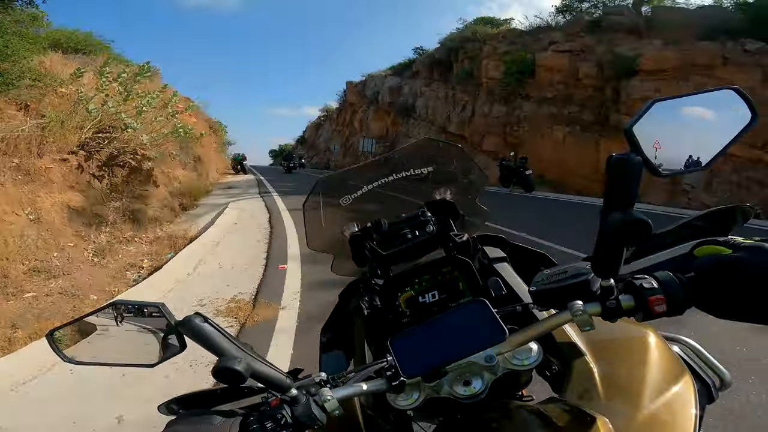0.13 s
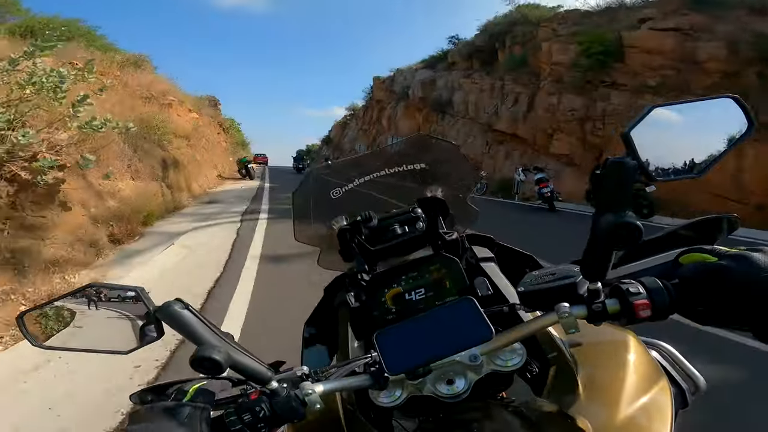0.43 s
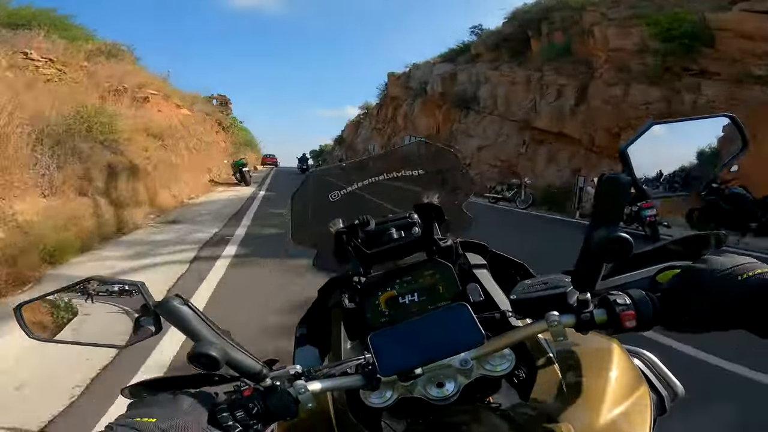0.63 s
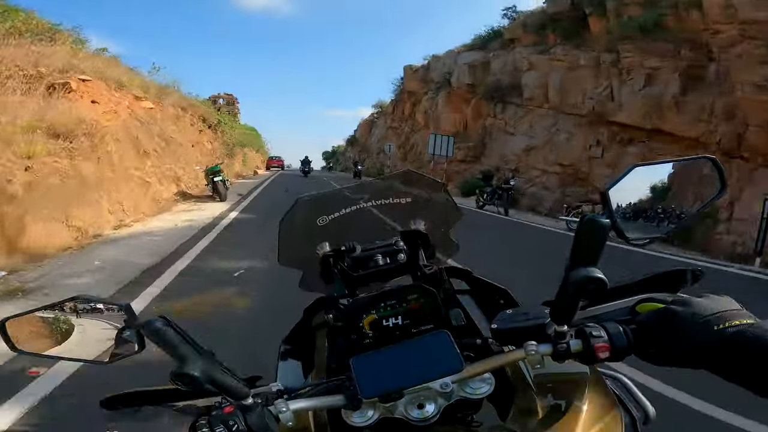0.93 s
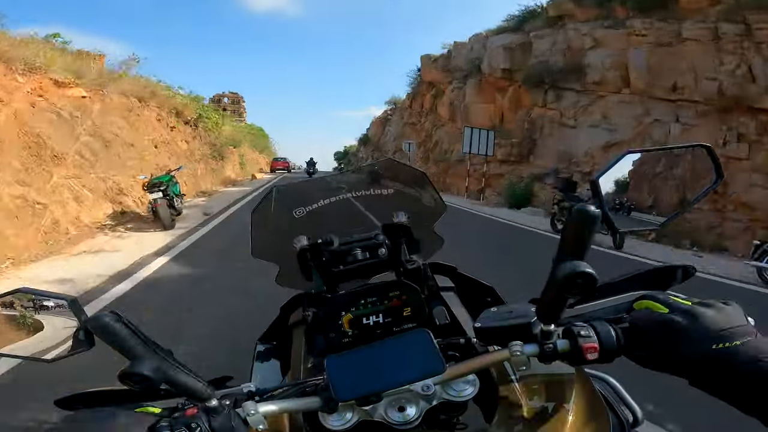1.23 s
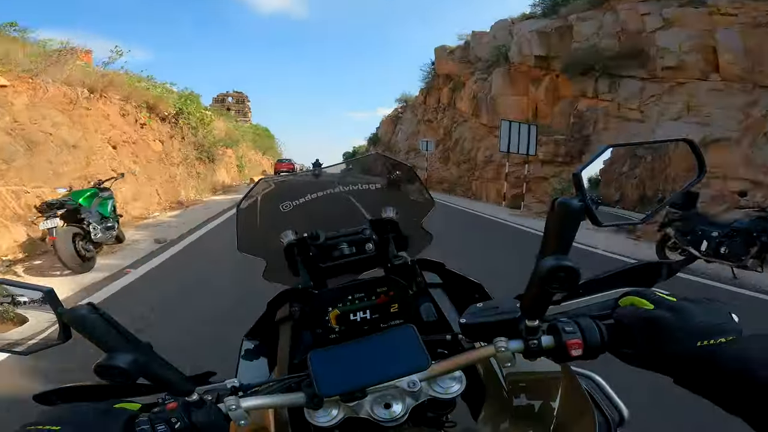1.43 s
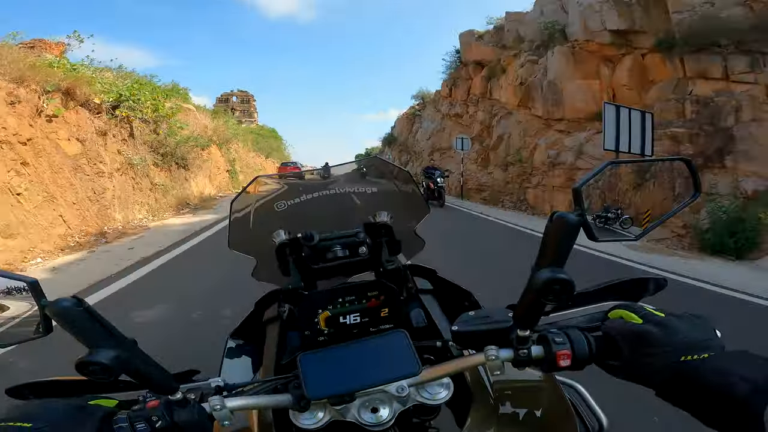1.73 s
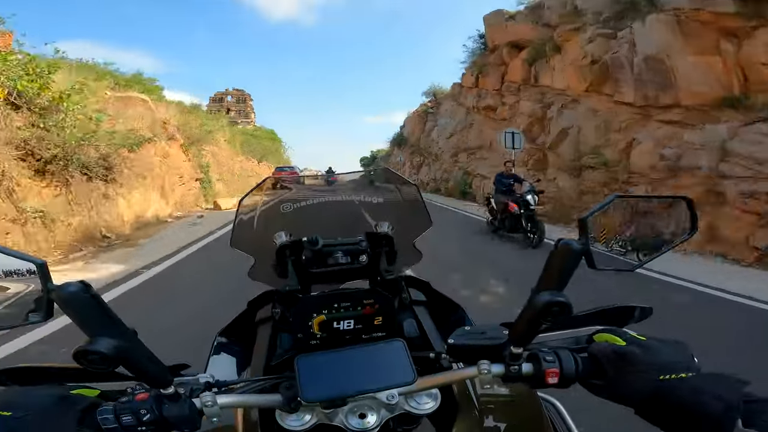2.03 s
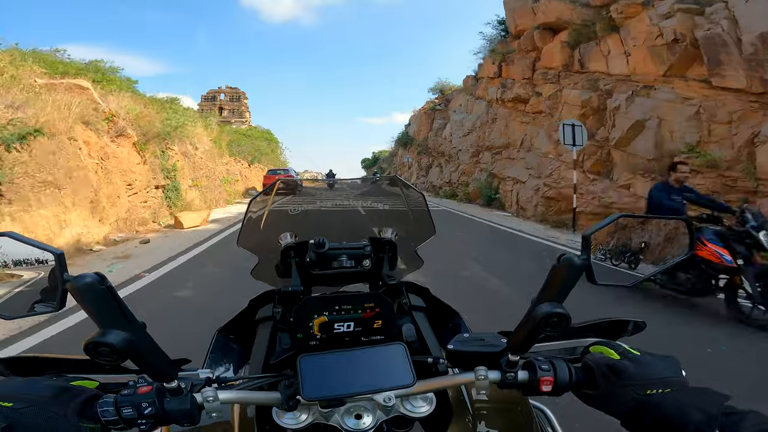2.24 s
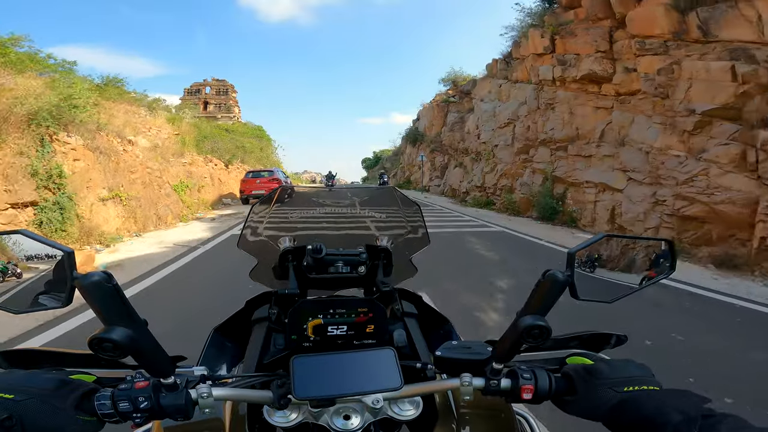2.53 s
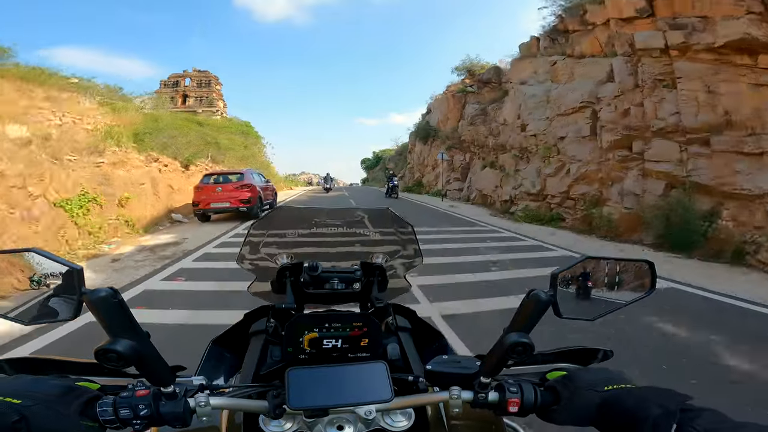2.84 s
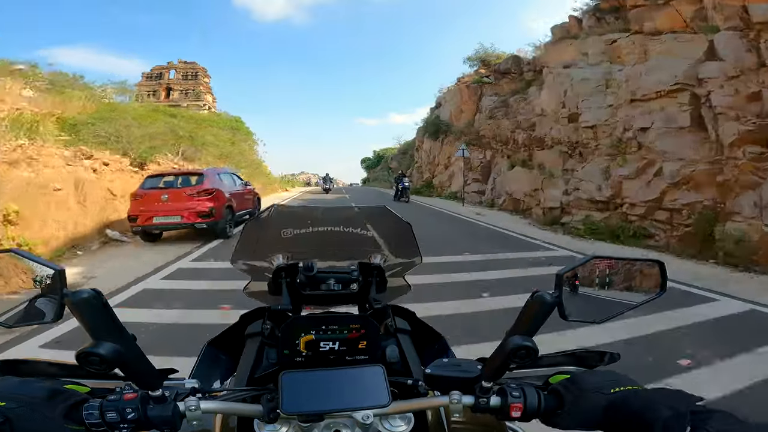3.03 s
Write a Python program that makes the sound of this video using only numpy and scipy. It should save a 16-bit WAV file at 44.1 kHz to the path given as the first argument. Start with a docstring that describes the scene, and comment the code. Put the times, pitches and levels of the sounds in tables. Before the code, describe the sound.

Close onboard motorcycle: throaty uneven exhaust pulses rise, the throttle shuts for a quick gear change, the note sinks, then climbs steadily until the throttle closes; steady roar and wind buffeting, slightly left of centre.

```python
"""A motorcycle pulls uphill, heard by one microphone near the rider's helmet, panned a little left.
The engine pulls; the throttle closes for a gear change with a short clunk, opens again and closes once more.
The exhaust knock, two uneven pulses per cycle ringing pipe resonances, comes and goes with the throttle.
Throughout, three low engine orders boom as tones, and filtered noise makes the wind rumble
and the roar of machinery, intake and road, which throbs with the firing cycle."""
import sys
import numpy as np
from scipy import signal
from scipy.io import wavfile
from scipy.ndimage import uniform_filter1d

SR = 44100
rng = np.random.default_rng(int(sys.argv[2]) if len(sys.argv) > 2 else 0)


def transcribe(signal):
    """Save signal, clipped to [-1, 1], as a 16-bit WAV file at the path in sys.argv[1]."""
    frames = np.atleast_2d(signal).T
    limited = np.clip(frames, -1, 1)
    pcm = np.round(limited * 32767).astype(np.int16)
    wavfile.write(sys.argv[1], SR, pcm)


N = 141120  # samples, 3.2 s


def gain_of(db):
    """The decibel law: amplitude gain for a level in dB."""
    return 10 ** (np.asarray(db) / 20)


def scaled_to_unit_rms(x):
    """Energy normalisation: the root mean square becomes 1."""
    return x / np.sqrt(np.mean(x ** 2) + 1e-20)


def read_spectrum(points, hz):
    """Spectral interpolation on a logarithmic frequency axis."""
    table_hz, value = np.transpose(points)
    return np.interp(np.log(hz + 1), np.log(table_hz + 1), value)


def follow(table, t):
    """Linear interpolation in time: every column of a table, read at the times t."""
    rows = np.array(table)
    return [np.interp(t, rows[:, 0], column) for column in rows.T[1:]]


def drift(seconds):
    """Random fluctuation of rms 1: white noise smoothed by two moving averages."""
    size = max(int(seconds * SR), 2)
    smooth = uniform_filter1d(rng.standard_normal(N), size)
    return scaled_to_unit_rms(uniform_filter1d(smooth, size))


def shaped_noise(field_db, size, patchy_db):
    """Short-time spectral shaping: random spectra under a dB field over (Hz, s), with drifting patches."""
    hop = size // 4
    frames, hz = N // hop + 5, np.fft.rfftfreq(size, 1 / SR)
    real, imaginary, patches = rng.standard_normal((frames, len(hz), 3)).T
    patches = uniform_filter1d(patches, size=8, axis=0)  # across frequency
    patches = scaled_to_unit_rms(uniform_filter1d(patches, size=8, axis=1))  # across time
    spectra = real + 1j * imaginary
    flat = signal.istft(spectra, nperseg=size, noverlap=size - hop)[1]
    level_db = field_db(hz[:, None], np.arange(frames) * hop / SR) + patchy_db * patches
    shaped = signal.istft(spectra * gain_of(level_db), nperseg=size, noverlap=size - hop)[1]
    return shaped[:N] / np.std(flat)


# Spectrum of the wind rumble. Each row: frequency in Hz, relative spectral level in dB.
RUMBLE_SPECTRUM = [(6, -28), (12, 12.5), (20, -12.5), (45, 1.5), (75, -1.5), (110, -6), (150, -18),
                   (250, -45), (500, -78)]
# Gusts of the wind. Each row: time in seconds, relative level of the rumble in dB.
WIND_GUSTS = [(0.0, -9.5), (0.07, -30.5), (0.61, -29), (0.72, -22), (0.79, -16), (0.84, -22), (1.07, -19),
              (1.11, -16), (1.33, -24.5), (1.42, -26), (1.71, -23.5), (2.7, -22.5), (2.74, -22),
              (2.98, -15.5), (3.12, -16.5), (3.19, -26)]


def wind():
    """Low-frequency random pressure: lumpy rumble at the microphone, shaped by spectrum and gusts."""
    def field(hz, t):
        return read_spectrum(RUMBLE_SPECTRUM, hz) + follow(WIND_GUSTS, t)[0] + 24.0
    return shaped_noise(field, size=4096, patchy_db=-1.0)


# Opening of the throttle. Each row: time in seconds, opening from 0 (shut) to 1 (open).
THROTTLE_OPENING = [(0.0, 0.63), (.57, 0.95), (.62, 0.59), (1.14, 0.13), (1.2, 1.0), (2.56, 1), (2.62, 0.2),
                    (3.2, 0.0)]


def throttle_opening(t):
    """Load control: the opening that sets the strength of the knock and the low burble."""
    return follow(THROTTLE_OPENING, t)[0]


# Spectrum of the roar. Each row: frequency in Hz, relative spectral level in dB.
ROAR_SPECTRUM = [(150, 13), (300, 5), (480, -6), (600, -6), (720, -10.5), (850, -7.5), (1150, -10.5),
                 (1390, -6), (1520, -8), (1690, -10), (1900, -12.5), (2500, -18.5), (2900, -24),
                 (3700, -31), (5000, -32), (5800, -35.5), (6900, -35.5), (7600, -41.5), (10000, -47.5),
                 (13000, -54.5), (15700, -59.5)]
# Course of the roar. Each row: time in seconds, relative level in dB, relative treble tilt in dB.
ROAR_COURSE = [(0.02, -31, -10), (0.09, -30, -4.5), (0.13, -27, -9), (0.27, -28.5, -7.5), (0.6, -29, -8),
               (0.7, -34, -5), (0.72, -29, -5.5), (0.73, -32.5, -7.5), (1.1, -33, -7), (1.26, -28.5, -7.5),
               (1.48, -32, -6.5), (2.2, -31.5, -6), (2.21, -29, -8.5), (2.51, -30.5, -6), (2.54, -30.5, -6),
               (2.7, -32.5, -5), (3.1, -32, -6.5), (3.15, -33.5, -6)]
TREBLE_HZ, TREBLE_DB = 3240, 11  # centre of the treble ramp, offset added to the tilt
BURBLE_HZ, BURBLE_DB = 600, 7.0  # upper edge of the burble, its gain from open to shut throttle
THROB_DEPTH = 0.046  # share of the amplitude


def roar(turns):
    """Amplitude-modulated noise: machinery, intake and road, with more low burble as the throttle shuts."""
    def field(hz, t):
        level_db, treble_db = follow(ROAR_COURSE, t)
        low_share = np.clip(2 - 2 * hz / BURBLE_HZ, 0, 1)
        treble_share = np.clip(hz / TREBLE_HZ - .5, 0, 1)
        burble_db = -BURBLE_DB * throttle_opening(t) * low_share
        bass_cut_db = .1 * np.maximum(150 - hz, 0)
        spectrum_db = read_spectrum(ROAR_SPECTRUM, hz) - bass_cut_db
        return spectrum_db + level_db + 14.5 + burble_db + (treble_db + TREBLE_DB) * treble_share
    throb = 1 + THROB_DEPTH * np.cos(2 * np.pi * (turns - .4))
    return shaped_noise(field, size=1024, patchy_db=0.46) * throb


# Strokes of the gear selector. Each row: start in seconds, peak level in dB.
SELECTOR_STROKES = [(0.7105, -23.5), (0.72, -32)]
# Ringing of the metal. Each row: frequency in Hz, relative level in dB, 60 dB decay time in seconds.
METAL_MODES = [(1430, 0.0, 0.011), (2170, -4, 0.0053), (3400, -21, 0.0044), (4900, -18, .008),
               (7200, -30.0, .005)]


def clunks():
    """Impact excitation of damped modes: a short rattle in the gearbox rings a few metal bands."""
    t, out = np.arange(4000) / SR, np.zeros(N)
    for start, peak_db in SELECTOR_STROKES:
        rattle = rng.standard_normal(len(t)) * np.minimum(t / 0.00065, 1) * np.exp(-t / 0.0046)
        ring = sum(gain_of(db - 60 * t / t60) * np.sin(2 * np.pi * hz * t) for hz, db, t60 in METAL_MODES)
        hit = signal.fftconvolve(rattle, ring * np.minimum(t / 0.00036, 1))[:len(t)]
        out[round(start * SR):][:len(t)] += gain_of(peak_db) * hit / abs(hit).max()
    return out


# Running of the engine. Each row: time in seconds, firing-cycle rate in Hz,
# then the rms levels of orders 1, 2 and 3 in dB.
ENGINE_COURSE = [(0.0, 36.07, -32, -22, -24), (0.13, 36.81, -12.5, -26, -29),
                 (0.29, 37.82, -17.5, -27, -27.5), (0.45, 38.9, -16, -22, -30.5),
                 (0.57, 39.38, -13.5, -33, -28), (0.63, 38.19, -14, -26, -29.5),
                 (0.69, 36.9, -29, -32, -20.5), (0.75, 36.3, -25, -28, -18),
                 (0.8, 33.92, -18.5, -24, -20.5), (0.93, 31.76, -21.5, -25, -18),
                 (1.1, 27.95, -34, -25, -27), (1.2, 28.61, -15.5, -24, -26), (1.36, 29.1, -22, -22.5, -22),
                 (1.45, 29.4, -15.5, -26.5, -28.5), (1.56, 30.05, -18, -19.5, -26),
                 (1.8, 31.29, -18, -22, -28.5), (2.0, 32.24, -19, -24.5, -27.5),
                 (2.23, 33.22, -17.5, -26, -27), (2.34, 33.97, -14.5, -22.5, -26.5),
                 (2.47, 34.52, -17, -37, -33), (2.57, 34.8, -17, -23.5, -33), (2.7, 33.9, -13.5, -29, -22),
                 (2.76, 33.1, -20, -24, -20), (2.85, 32.71, -19.5, -22, -17.5),
                 (2.91, 33.23, -26, -19, -25), (2.96, 33.4, -17, -36, -20), (3.1, 33.1, -21, -29, -26),
                 (3.2, 31.79, -23.5, -22, -19.5)]


def engine_course(t):
    """Phase is the integral of frequency: cycles turned, with the cycle rate and the order levels."""
    hz, *orders_db = follow(ENGINE_COURSE, t)
    turns = .48 + np.cumsum(hz) / SR  # starts .48 into a cycle
    return hz, turns, orders_db


# Phase lags of engine orders 1, 2 and 3, in firing cycles.
ORDER_LAGS = [0.0, -.035, .045]
BOOM_UNEVEN_DB = 0.5


def boom(turns, levels_db):
    """Harmonic synthesis: the three lowest engine orders, as slightly lumpy tones."""
    out = np.zeros(N)
    for order, (db, lag) in enumerate(zip(levels_db, ORDER_LAGS), start=1):
        peak = np.sqrt(2) * gain_of(db + BOOM_UNEVEN_DB * drift(0.01))
        out += peak * np.cos(2 * np.pi * order * (turns - lag))
    return out


# Exhaust knock. Each row: time in seconds, then the relative level in dB of each pipe resonance
# but the last, in turn.
KNOCK_LEVELS = [(0.0, -59, -26, -49, -38, -49, -34, -41, -58),
                (0.06, -31, -23, -39, -21.5, -41, -27.5, -26, -45),
                (0.16, -39, -22.5, -32, -23, -28, -28, -34, -42.5),
                (0.52, -51, -22, -23, -34.5, -40, -26.5, -31, -36),
                (0.63, -40, -30, -39, -36.5, -39, -52, -48, -34.5),
                (0.93, -36, -23, -37.5, -43, -56, -62, -57, -38),
                (1.09, -27, -48, -49, -31, -47, -47, -39, -33.5),
                (1.15, -23.5, -36, -27.5, -39, -48, -50, -47, -49),
                (1.22, -29, -25, -23.5, -28.5, -44, -37, -58, -30),
                (1.3, -19.5, -35, -20.5, -36.5, -39.5, -67, -62, -42),
                (1.53, -33.5, -23, -21, -35, -35.5, -66, -54, -37),
                (1.6, -34, -26.5, -17, -43, -37, -39.5, -74, -41),
                (2.03, -24, -31, -16.5, -59, -36.5, -37.5, -48, -40),
                (2.3, -25.5, -27, -23, -36, -32, -24, -35, -36),
                (2.42, -27, -24, -29, -51, -32, -23.5, -40, -44),
                (2.6, -41, -25, -32, -29, -51, -35.5, -44, -28),
                (2.64, -38, -42, -44, -33, -36, -43, -43, -30.5),
                (2.73, -52, -29, -43, -50, -44, -37, -52, -34),
                (2.9, -48, -30, -43, -36, -43, -48, -49, -34),
                (3.02, -36, -19, -42, -38, -42, -32, -51, -28),
                (3.2, -45, -55, -48, -55, -34, -49, -58, -45)]
# Pipe resonances. Each row: nominal centre in Hz, nominal width in Hz, how far the centre follows the rise,
# strength of the second cylinder against the first.
PIPE_RESONANCES = [(154.94, 121, 0.4, 1.1), (232, 93, 0.19, 0.68), (329, 33, 0.66, 3.4),
                   (407.3, 60, 0.47, 0.29), (609.3, 34, 1.05, 0.17), (828, 45, 0.26, 0.35),
                   (952, 62, 0.75, 0.55), (1384, 42, 0.12, 0.27), (1697, 30, 0.15, 0.35)]
# The resonances creep up during each pull. Each row: time in seconds, rise as a share of the centre.
RESONANCE_RISE = [(0.0, -0.047), (.57, 0.064), (1.15, -0.083), (2.55, 0.057), (3.2, -0.019)]
TOP_DB = -3  # last resonance against the one before
STEEPNESS = 1.264  # how fast the skirts of the resonances fall
BARE_DB, BARE_HZ = -50.5, 1400  # relative level and reach of the bare pulse
SECOND_LAG = .345  # the second cylinder fires this many cycles late
LOOSE_FROM = 13  # orders above this do not line up with the pulse
WOBBLE_OPEN, WOBBLE_SHUT, WOBBLE_S = .0015, .012, .04  # rms in cycles, throttle open and shut; smoothing in s
ORDER_DRIFT, ORDER_DRIFT_DB = .065, 1.2  # each order wanders by itself: phase in cycles, level
KNOCK_DB, SHUT_DB, UNEVEN_DB = -2.5, -5, 0.5  # overall, added as the throttle shuts, fluctuation


def pipe_response(order_hz, late, levels, rise):
    """Resonance filtering: the bare pulse plus each pipe resonance, excited by both cylinders."""
    response = gain_of(BARE_DB) / (1 + (order_hz / BARE_HZ) ** 2)
    for level, (centre, width, share, second) in zip(levels, PIPE_RESONANCES):
        detuning = 2 * (order_hz - centre * (1 + share * rise)) / width
        both_cylinders = (1 + second * late) / (1 + second)
        response = response + level * both_cylinders / (1 + detuning ** 2) ** STEEPNESS
    return response


def knock(t, hz, turns):
    """Source and filter: two uneven pulses per cycle ring the pipe, weaker and less steady when shut."""
    coarse = np.linspace(0, N / SR, num=2000)  # slow time grid for the orders
    levels_db = follow(KNOCK_LEVELS, coarse)
    levels = gain_of(levels_db + [levels_db[-1] + TOP_DB])
    rise = follow(RESONANCE_RISE, coarse)[0]
    opening = throttle_opening(t)
    wobble = WOBBLE_SHUT + (WOBBLE_OPEN - WOBBLE_SHUT) * opening
    turns = turns + wobble * drift(WOBBLE_S)
    rate = np.interp(coarse, t, hz)
    out = np.zeros(N)
    for k in range(4, 60):  # engine orders
        late = np.exp(-2j * np.pi * k * SECOND_LAG)
        response = pipe_response(k * rate, late, levels, rise)
        wander = uniform_filter1d(rng.standard_normal((2, len(coarse))), size=130)
        slip, swell = scaled_to_unit_rms(uniform_filter1d(wander, size=130))
        size = response * gain_of(ORDER_DRIFT_DB * swell) * np.exp(2j * np.pi * ORDER_DRIFT * slip)
        loose_phase = rng.random() * (k > LOOSE_FROM)
        carrier = np.exp(2j * np.pi * (k * turns - loose_phase))
        out += (np.interp(t, coarse, size) * carrier).real
    return out * gain_of(KNOCK_DB + SHUT_DB * (1 - opening) + UNEVEN_DB * drift(0.084))


def scene():
    """Superposition: all sources add at one microphone, copied to two channels."""
    t = np.arange(N) / SR
    hz, turns, orders_db = engine_course(t)
    background = wind() + roar(turns) + clunks()
    engine = boom(turns, orders_db) + knock(t, hz, turns)
    mono = background + engine
    return np.array([mono, mono])


CEILING = 0.92  # where the microphone stage rounds off peaks, full scale = 1
LEFT_DB, RIGHT_DB = 1.96, -2.54
EDGE_HZ = 15720  # upper band limit


def record(dry):
    """Soft saturation, level panning, then a linear-phase low-pass band limit."""
    rounded = CEILING * np.tanh(dry / CEILING)
    panned = rounded * gain_of([[LEFT_DB], [RIGHT_DB]])
    low_pass = signal.firwin(511, EDGE_HZ, window=("kaiser", 9), fs=SR)
    return signal.oaconvolve(panned, low_pass[None], "same")


dry = scene()
out = record(dry)
transcribe(out)
```